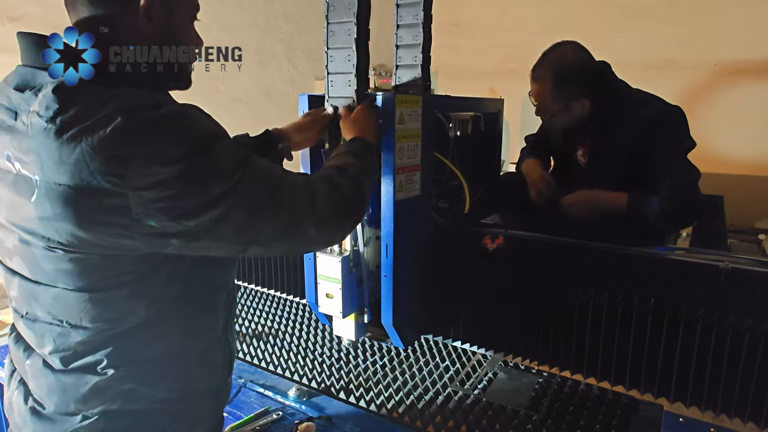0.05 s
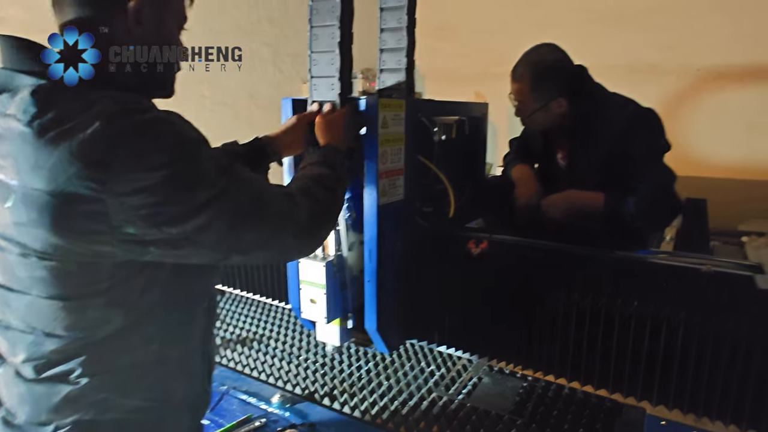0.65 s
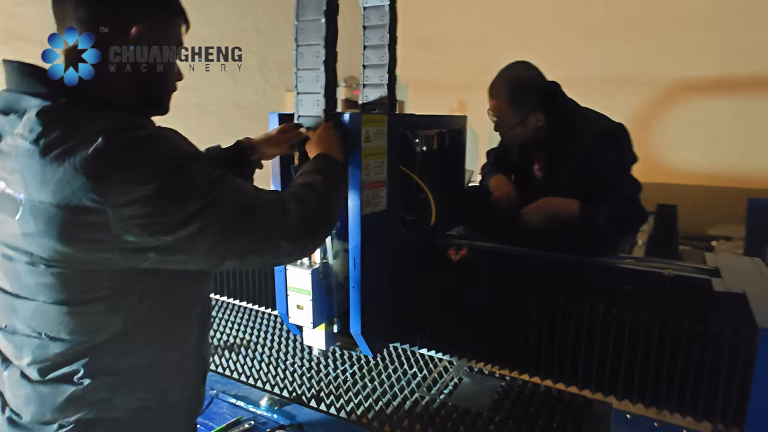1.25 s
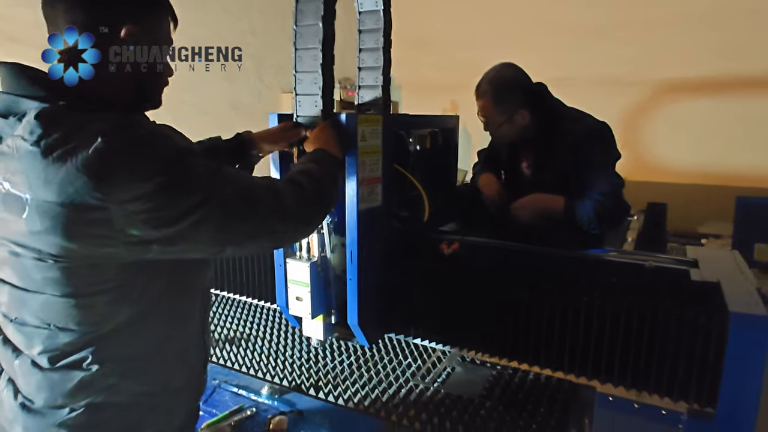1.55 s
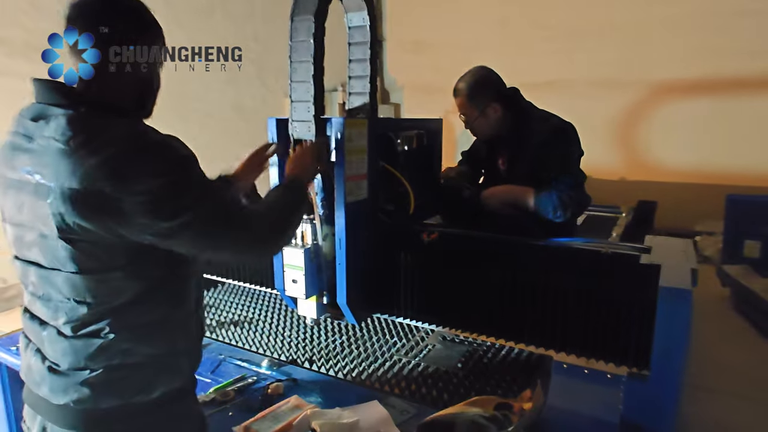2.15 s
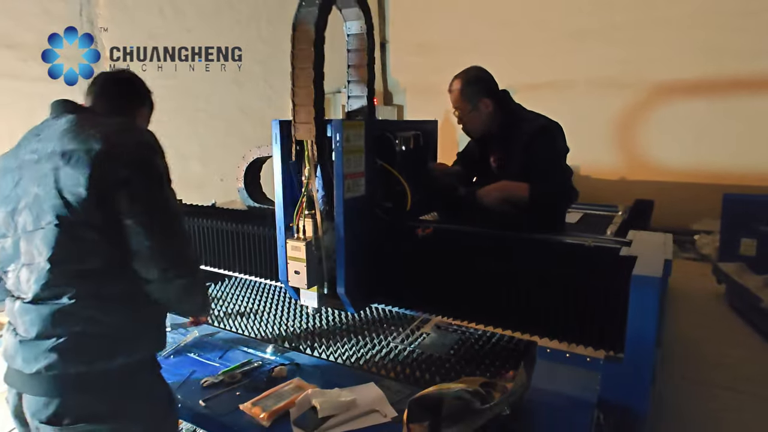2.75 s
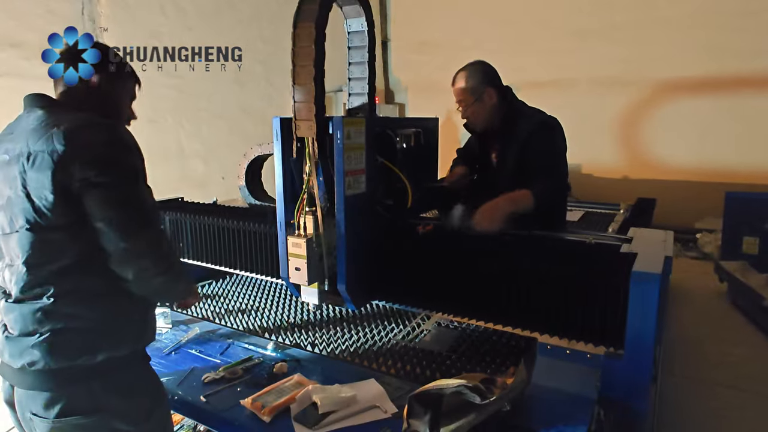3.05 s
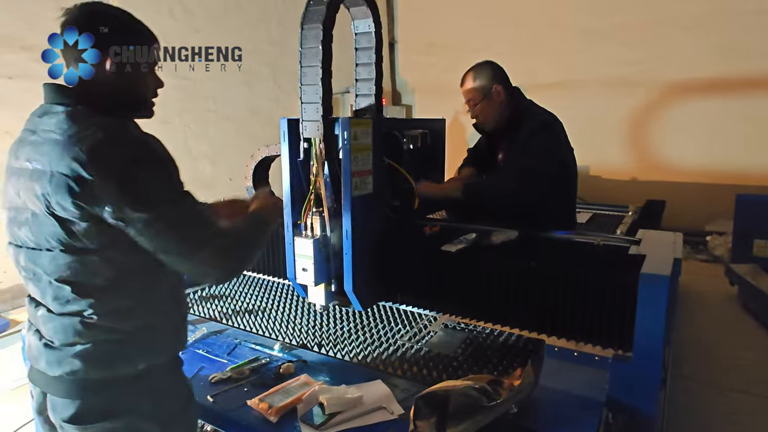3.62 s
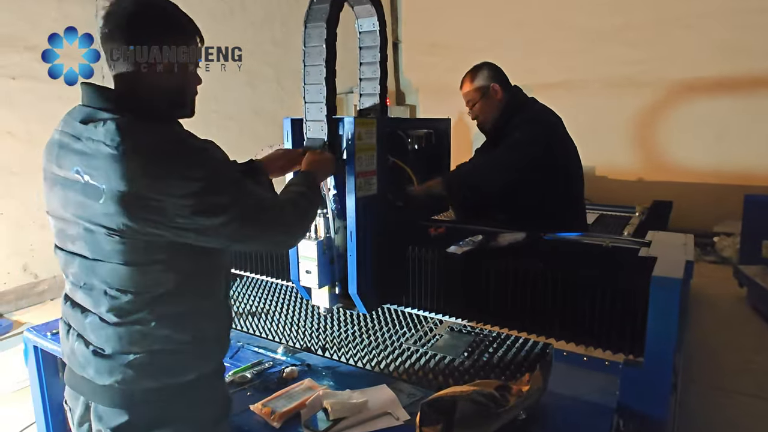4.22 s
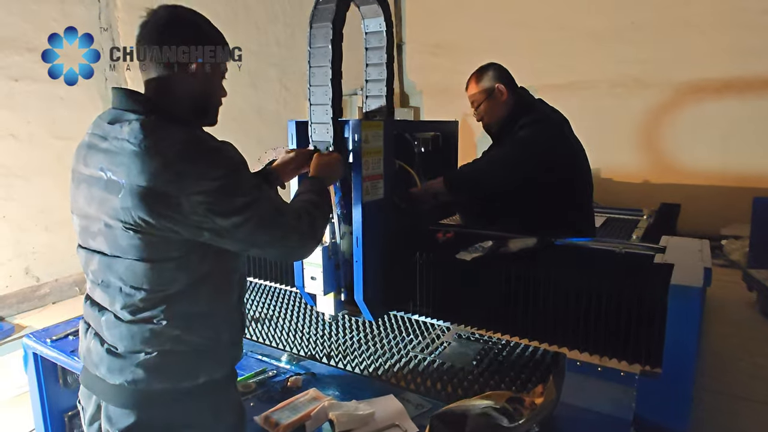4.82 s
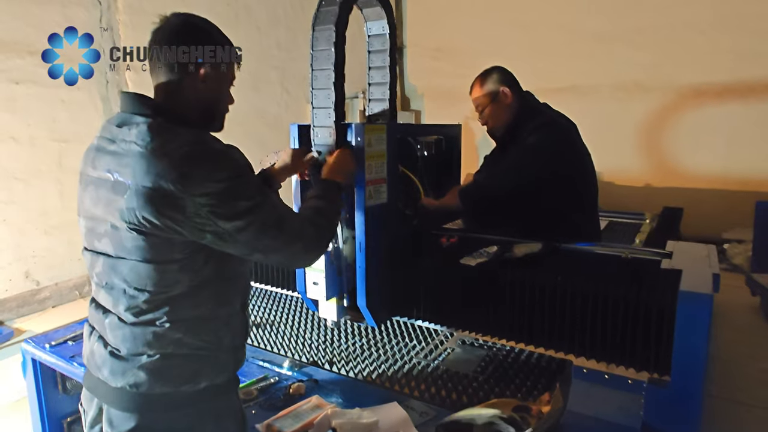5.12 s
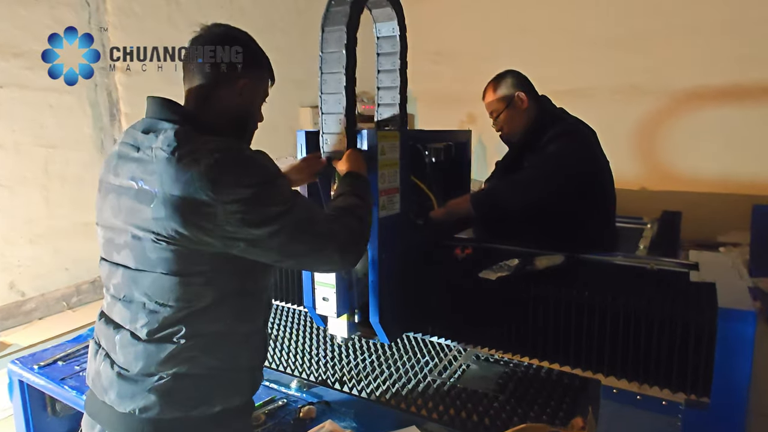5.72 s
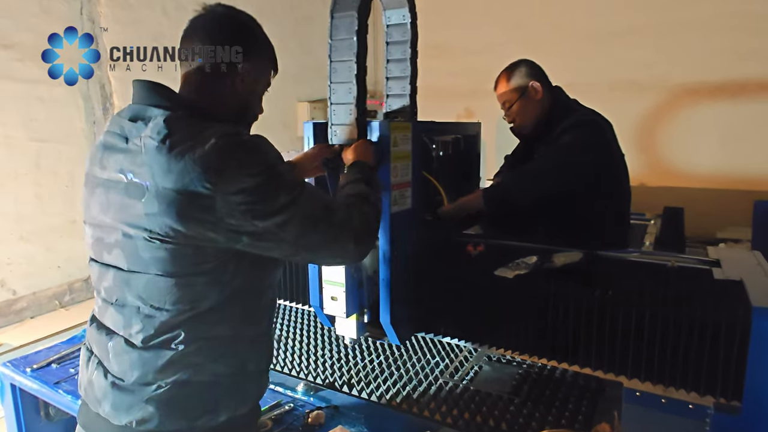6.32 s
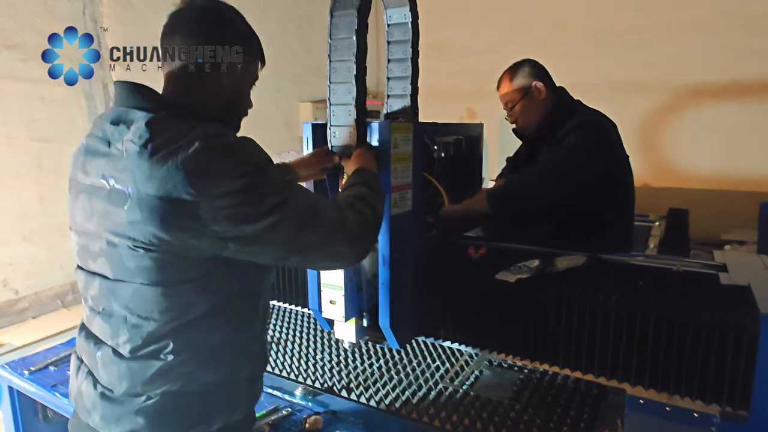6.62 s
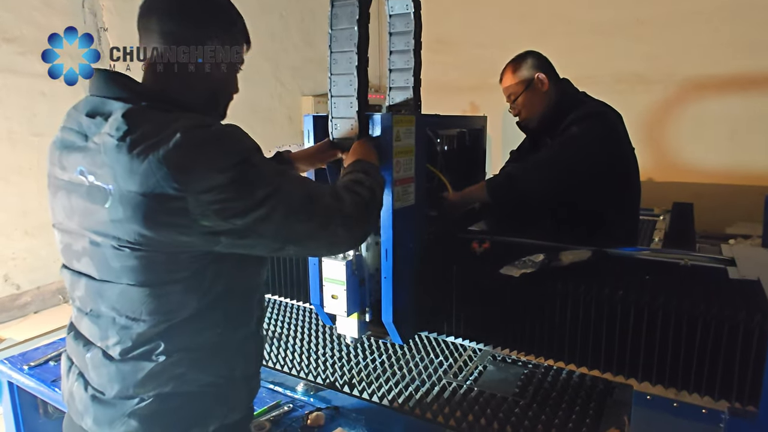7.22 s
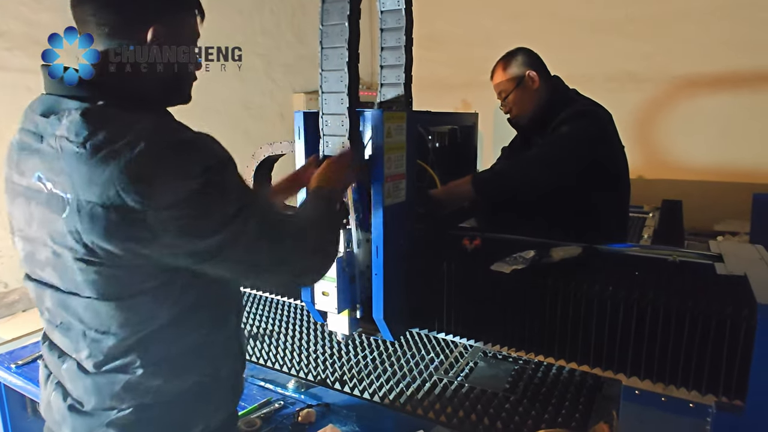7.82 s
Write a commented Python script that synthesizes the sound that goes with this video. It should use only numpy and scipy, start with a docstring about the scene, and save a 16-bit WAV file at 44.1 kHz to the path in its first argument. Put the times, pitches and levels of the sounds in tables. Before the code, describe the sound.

A laser cutter idles throughout in a bare workshop, with a faint mains hum, cooling fans and a thin wavering whine. A soft hiss swells into a sharp metallic valve snap at 0.7 seconds. Light finger ticks on fittings, a weaker hiss and nylon jacket rustle follow, until the valve shuts with a loud snap at 1.8 seconds. Each snap has a tiny rebound, a brief sheet-metal ring and a short room echo. From about 2.7 to 5 seconds there are only quiet sounds: a faint hiss, scattered ticks, scuffs of shoes and hands, and the jacket crinkling. After a lull, a softer valve snap comes at 6.4 seconds, followed by a slight hiss and scuff. A last loud, bright snap lands at 7.5 seconds, then faint rustle and one small tick over the hum at 8 seconds. The snaps are far louder than everything else.

```python
"""A laser cutter's gas valve snaps open and, a second later, shut, twice over, in a bare workshop.
Each slam of the plunger rings the valve body and the sheet-metal head and is answered by the hall.
Under it the machine idles with mains hum and cooling fans, and a soft hiss swells and fades.
Fingers tick on the fittings, shoes and hands scuff, and a padded nylon jacket rustles."""
import sys
import numpy as np
from scipy import signal
from scipy.fft import rfft, irfft, next_fast_len
from scipy.io import wavfile
from scipy.ndimage import uniform_filter1d, map_coordinates

SR = 44100
rng = np.random.default_rng(int(sys.argv[2]) if len(sys.argv) > 2 else 0)


def store_pcm(level_fs):
    """Save levels as 16-bit WAV."""
    pcm = np.round(np.clip(level_fs, -1, 1) * 32767).astype(np.int16)
    wavfile.write(sys.argv[1], SR, np.atleast_2d(pcm).T)


N = 355887


def amp(db):
    """Decibels to gain."""
    return 10 ** (np.asarray(db) / 20)


def unit_rms(x):
    """Scaled to rms 1."""
    return x / np.sqrt(np.mean(x ** 2) + 1e-20)


def along(points, hz):
    """Interpolate (Hz, value) points on a log frequency axis."""
    knots_hz, values = np.transpose(points)
    return np.interp(np.log(hz + 1), np.log(knots_hz + 1), values)


def clock():
    """Sample times in seconds."""
    return np.arange(N) / SR


def wobble(rate_hz):
    """Smooth random curve, rate_hz knots a second."""
    knots = rng.standard_normal(int(N * rate_hz / SR) + 4)
    return map_coordinates(knots, [clock() * rate_hz])


def filtered(x, response):
    """Apply a gain given as a function of Hz."""
    size = x.shape[-1]
    padded = next_fast_len(size + SR // 10)
    return irfft(rfft(x, padded) * response(np.fft.rfftfreq(padded, 1 / SR)), padded)[..., :size]


def shape(spectrum):
    """Gain curve of a (Hz, dB) spectrum."""
    return lambda hz: amp(along(spectrum, hz))


def resonance(centre_hz, q, stages=1):
    """Gain curve of equal resonators in series."""
    return lambda hz: 1 / np.hypot(1, q * (hz / centre_hz - centre_hz / (hz + 1))) ** stages


def strike(t, rise_s, t60_s):
    """Envelope: up 60 dB in rise_s to t = 0, then a decay."""
    return amp(-60 * np.maximum(-t / rise_s, t / t60_s))


def swell(peak_s, rise_db_per_s, hold_s, fall_db_per_s):
    """Envelope: climbs until peak_s, holds, sinks."""
    t = clock() - peak_s
    return amp(-np.maximum(0, np.maximum(-t * rise_db_per_s, (t - hold_s) * fall_db_per_s)))


def add(track, start_s, sound):
    """Mix a sound into the track."""
    part = track[:, max(round(start_s * SR), 0):]
    part[:, :sound.shape[-1]] += sound[:, :part.shape[-1]]


# Likeness of the two channels. Each row: frequency in Hz, left-right correlation.
STEREO_CORRELATION = [(100, 0.99), (300, 0.67), (700, 0.69), (1200, .7), (2000, .05), (3600, -0.54),
                      (5000, 0.85), (9000, -0.29)]

def noise(gain, size=N):
    """Coloured stereo noise of rms 1; channel correlation varies with frequency."""
    def mid_side_gain(hz):
        angle = np.arccos(np.clip(along(STEREO_CORRELATION, hz), -1, 1)) / 2
        return gain(hz) * np.array([np.cos(angle), np.sin(angle)])
    mid, side = filtered(rng.standard_normal((2, size)), mid_side_gain)
    return unit_rms(np.array([mid + side, mid - side]))


# Mains harmonics and fan tones. Each row: frequency in Hz, level in dB.
HUM_TONES = [(100, -64.5), (150, -71), (187.5, -70.5), (200, -72), (250, -76), (300, -69), (400, -82),
             (500, -80), (548, -83.5), (600, -80), (700, -78.5), (900, -85)]
# Course of the whine. Each row: time in seconds, level in dB.
WHINE_LEVELS = [(0, -79), (1.5, -73.5), (2.5, -75), (3.5, -72.5), (4.4, -75), (5.5, -74.5), (6.2, -77.5),
                (8, -78.5)]
# Fan rush, and the shared hiss and fizz. Each row: frequency in Hz, density in dB.
FAN_SPECTRUM = [(12, -58.5), (20, -21.5), (43, -11), (70, -7.5), (103, -9.5), (123, -4.5), (192, -1.5),
                (226, -8.5), (306, -12), (325, -16), (775, -15), (840, -15.5), (910, -16.5), (1050, -18.5),
                (2500, -35.5), (3250, -61.5), (5500, -120)]
HISS_SPECTRUM = [(600, -22.5), (1200, -5.5), (2200, 2), (3200, 2), (4700, 2), (5500, -1.5), (6400, -17),
                 (9000, -38)]
FIZZ_SPECTRUM = [(2500, -27.5), (5000, -9.5), (7000, 1), (9000, 2.5), (12000, 0.5), (15500, -3.5)]

def idling_machine(hum_db=-3, whine_hz=800, fans_db=-65, vent_db=-82, fizz_db=-86):
    """Mains and fan tones waver over the rush of cooling air; a whine swells and recedes."""
    t = clock()
    def tone(hz):
        waver = np.sqrt(2) * amp(0.6 * wobble(3))
        return waver * np.sin(2 * np.pi * (hz * t + rng.random()) + 0.15 * wobble(3))
    hum = amp(hum_db) * sum(amp(db) * tone(hz) for hz, db in HUM_TONES)
    whine = amp(np.interp(t, *np.transpose(WHINE_LEVELS))) * tone(whine_hz)
    fans = amp(fans_db) * noise(shape(FAN_SPECTRUM))
    vent = amp(vent_db) * noise(shape(HISS_SPECTRUM)) + amp(fizz_db) * noise(shape(FIZZ_SPECTRUM))
    return hum + whine + fans + vent


# Swells of hiss. Each row: peak in seconds, level in dB, rise in dB/s, hold in seconds, fall in dB/s.
HISS_SWELLS = [(0.02, -66, 30, 0.045, 22), (0.652, -50, 48, .04, 35), (1.164, -61.5, 43.5, 0.31, 116),
               (2.72, -66, 25, 0.026, 66.5), (3.918, -76.5, 14, .5, 24), (5.427, -76, 13.5, 0.25, 16),
               (6.498, -65.5, 199.5, 0.099, 87.5), (6.75, -74.5, 40.5, .25, 33.5)]

def soft_hiss(hiss_db=3, fizz_db=-6.5, rumble_db=-11, rumble_hz=78):
    """A soft hiss swells and fades, with a fine fizz above it and a low rumble."""
    power = sum((amp(db) * swell(peak_s, *course)) ** 2 for peak_s, db, *course in HISS_SWELLS)
    hiss = amp(hiss_db) * noise(shape(HISS_SPECTRUM))
    fizz = amp(fizz_db + 0.6 * wobble(36)) * noise(shape(FIZZ_SPECTRUM))
    flutter = amp(0.19 * wobble(17))
    rumble = amp(rumble_db) * noise(resonance(rumble_hz, q=2.2))
    return np.sqrt(power) * (flutter * (hiss + fizz) + rumble)


# Finger taps. Each row: time in seconds, level in dB, resonance in Hz, treble in dB.
FINGER_TICKS = [(0.092, -44.5, 4640, -21), (0.1616, -41.5, 2410, -29), (0.3295, -46.5, 2860, -11),
                (0.4785, -48.5, 3504, -29), (0.9192, -37.5, 2740, -33), (1.051, -41, 2300, -15),
                (1.1442, -45, 2680, -12), (1.176, -40, 4960, -8), (1.2115, -36.5, 3470, -20),
                (1.27, -45.5, 5100, -11), (1.3934, -47, 4940, -6), (1.4705, -42.5, 2820, -31),
                (1.6473, -43.5, 2550, -27), (1.6676, -38, 2970, -12.5), (1.698, -46.5, 2300, -31),
                (1.7354, -48.5, 2540, -21), (2.6888, -45.5, 4570, -18.5), (2.9786, -46.5, 1860, -17.5),
                (3.4095, -45.5, 1460, -12.5), (4.2485, -48.5, 1896, -14), (4.2878, -45.5, 2254, -36.5),
                (4.3126, -43, 2043, -20.5), (4.5269, -52.5, 1160, -14), (4.8699, -44.5, 1250, -16.5),
                (5.023, -56.5, 1420, -8), (5.115, -55, 1130, -14), (8.0047, -51, 2505, -22)]

def finger_ticks(body_db=-4, hiss_db=-9, fizz_db=1, lead_s=0.01, rise_s=0.002):
    """A finger taps a fitting: a short resonance with a bright edge."""
    out = np.zeros((2, N))
    t = np.arange(SR // 2) / SR - lead_s
    for at_s, db, hz, treble_db in FINGER_TICKS:
        body = amp(body_db) * strike(t, rise_s, t60_s=0.03) * noise(resonance(hz, q=15), len(t))
        hiss = amp(hiss_db) * noise(shape(HISS_SPECTRUM), len(t))
        fizz = amp(fizz_db + treble_db) * noise(shape(FIZZ_SPECTRUM), len(t))
        edge = strike(t, rise_s, t60_s=0.032) * (hiss + fizz)
        add(out, at_s - lead_s, amp(db) * (body + edge))
    return out


# Hall decay. Each row: frequency in Hz, T60 in seconds.
HALL_DECAY = [(200, 0.24), (800, 0.33), (1800, 0.36), (3200, 0.37), (5000, 0.42), (8000, .36),
              (15000, 0.18)]
# Wall reflection. Each row: frequency in Hz, gain in dB.
WALL_SPECTRUM = [(200, 1.5), (650, -2.5), (880, -3), (1300, -3), (1900, 0), (3000, -1), (4500, 0.5),
                 (7000, -3.5), (15000, -8)]

def hall(x, late_db=-18, late_t60_s=1.1, build_s=0.01):
    """Reflections: a dense tail that builds up, and a weak long one from the far end."""
    hz, t, bins = signal.stft(noise(np.ones_like, SR), SR, nperseg=256)
    dense = amp(-60 * t / along(HALL_DECAY, hz)[:, None])
    late = amp(late_db - 60 * t / late_t60_s) * shape(WALL_SPECTRUM)(hz)[:, None]
    arrivals = 1 - np.exp(-(np.arange(SR) / SR / build_s) ** 2)
    tail = signal.istft(bins * (dense + late), SR, nperseg=256)[1][:, :SR] * arrivals
    tail = filtered(unit_rms(tail) / np.sqrt(SR), shape(WALL_SPECTRUM))
    return signal.fftconvolve(x, tail, axes=1)[:, :x.shape[-1]]


# Shoe and hand scuffs. Each row: middle in seconds, level in dB, half length in seconds,
# centre in Hz, weight in dB.
SCUFF_STROKES = [(0.52, -62.5, 0.25, 901, -3.5), (1.101, -65, 0.29, 700, -0.5), (1.49, -72, 0.02, 1090, 14),
                 (2.771, -65.5, 0.015, 1580, -2.5), (2.91, -62.5, 0.015, 850, -3),
                 (3.0, -59, 0.026, 1172, 0.5), (3.227, -62.5, 0.02, 2400, -13), (3.31, -65, 0.013, 2300, 0),
                 (3.369, -66.5, 0.03, 1405, -4.5), (3.421, -57, 0.017, 1150, -1.5),
                 (3.482, -63, 0.0096, 1278, -7), (4.289, -57, 0.035, 1867, -9),
                 (4.845, -66.5, 0.038, 2300, -3), (5.934, -68.5, 0.074, 750, -8),
                 (6.545, -58.5, 0.057, 1594, -2)]
# Dull body of a scuff. Each row: frequency in Hz, density in dB.
SOLE_SPECTRUM = [(30, -23.5), (90, -4), (280, -1.5), (420, -8.5), (800, -6), (1500, -22), (3000, -40.5)]

def scuffs(grit_db=4):
    """Shoes and hands rub: gritty friction with dull weight behind it."""
    out = np.zeros((2, N))
    t = np.arange(SR // 2) / SR
    for middle_s, db, half_s, hz, weight_db in SCUFF_STROKES:
        roughness = unit_rms(uniform_filter1d(rng.standard_normal(len(t)), size=130))
        grit = unit_rms(amp(grit_db * roughness))
        rub = grit * noise(resonance(hz, q=2.2, stages=2), len(t))
        weight = amp(weight_db) * noise(shape(SOLE_SPECTRUM), len(t))
        stroke = np.exp(-((t - t.mean()) / half_s) ** 4)
        add(out, middle_s - t.mean(), amp(db) * stroke * (rub + weight))
    return out


def ringing(modes, t, tint_db=np.zeros_like):
    """Struck metal: decaying modes, neighbours in opposite sign, high ones out of step left to right."""
    hz, db, t60_s = np.transpose(modes)[:, :, None]
    age_s = np.maximum(t, 0)
    signs = (-1) ** np.arange(len(hz))[:, None]
    gains = signs * amp(db + tint_db(hz) + rng.normal(0, 0.97, hz.shape))
    skew_rad = np.multiply.outer([1, -1], hz / 5500)
    waves = gains * amp(-60 * age_s / t60_s) * np.sin(2 * np.pi * hz * age_s + skew_rad)
    return waves.sum(axis=1) * (1 - np.exp(-age_s / 0.0003))


# Cutting head modes. Each row: frequency in Hz, level in dB, T60 in seconds.
HEAD_MODES = [(656, -3.5, .085), (774.4, -5.5, 0.068), (834, -3.5, 0.033), (1066.3, -1.5, .06),
              (1232, -3.5, 0.05), (1367, -3, 0.039), (1580, -14.5, 0.031)]
# Knock on the head. Each row: frequency in Hz, density in dB.
KNOCK_SPECTRUM = [(400, -38), (570, -5.5), (680, -3), (1350, 1), (1700, -10.5), (3000, -41)]

def cutting_head(t, blow, focus_hz, db_per_octave, knock_db=-10, highpass_hz=520):
    """A blow favours the modes near focus_hz; the small head radiates little bass."""
    tint_db = lambda hz: -db_per_octave * np.abs(np.log2((hz + 1) / focus_hz))
    knock = amp(knock_db) * blow * noise(lambda hz: amp(along(KNOCK_SPECTRUM, hz) + tint_db(hz)), len(t))
    highpass = signal.butter(7, highpass_hz, "high", fs=SR, output="sos")
    return signal.sosfilt(highpass, ringing(HEAD_MODES, t, tint_db) + knock)


# Valve body modes. Each row: frequency in Hz, level in dB, T60 in seconds.
VALVE_MODES = [(1960, -12, 0.036), (1975, -17, 0.078), (2250, -13, .05), (2950, -19.5, 0.014),
               (4240, -18, 0.017), (4780, -14.5, 0.026), (5100, -16.5, .03), (5428, -20.5, 0.028)]
# Noisy parts of a snap. Each row: frequency in Hz, density in dB.
CRACK_SPECTRUM = [(400, -36), (580, -12.5), (900, 1), (1400, 1.5), (1800, -2), (2300, 0), (3200, -4.5),
                  (4100, -2), (4900, 1.5), (5600, -4.5), (6500, -15), (9000, -38)]
SIZZLE_SPECTRUM = [(4500, -42), (6500, -4.5), (7200, -6), (8800, 2), (11000, -5.5), (13000, -7),
                   (15500, -8.5)]
THUD_SPECTRUM = [(40, -27), (110, -7), (160, -4.5), (215, 2.5), (320, -8.5), (500, -11.5), (900, -40)]
# Plunger slams. Each row: time in seconds, head ring in dB, focus in Hz, fall-off in dB/octave, # crack,
# sizzle, thud, room and lead-in in dB, echo delay in seconds, echo in dB, # cover ring in Hz, cover ring in dB,
# left over right in dB, seat ping in dB.
VALVE_SNAPS = [(0.6871, -10, 1080, 6.5, -17.5, -23, -44.5, -13.5, -9, 0.032, -22.5, 1260, -35.5, 1, -26.5),
               (1.8060, -6, 856, 30, -11, -19.5, -38, -8.5, -27.5, 0.029, -24.5, 880, -32, 2.5, -22),
               (6.3767, -21.5, 670, 6, -25, -35, -49.5, -10, -24, 0.028, -42, 1200, -53, 3, -27),
               (7.4539, -13.5, 1220, 16.5, -10, -18.5, -45, -9, -23, 0.028, -15, 1690, -33.5, 3, -14.5)]

def valve(margin_s=0.04, lead_in_s=0.04, rise_s=0.007, ping_hz=4950, head_room_db=-4):
    """The plunger slams: the seat pings, valve, head and covers ring, and a faint echo of the snap follows."""
    out = np.zeros((2, N))
    t = np.arange(SR) / SR - margin_s
    for (at_s, ring_db, focus_hz, db_per_octave, crack_db, sizzle_db, thud_db, room_db, lead_in_db,
         echo_s, echo_db, cover_hz, cover_db, pan_db, ping_db) in VALVE_SNAPS:
        # a brief rush of noise rises into each snap
        lead_in = amp(lead_in_db) * strike(t, lead_in_s, t60_s=rise_s)
        blow = lambda t60_s: lead_in + strike(t, rise_s, t60_s)
        head = amp(ring_db) * cutting_head(t, blow(t60_s=0.05), focus_hz, db_per_octave)
        crack = amp(crack_db) * blow(t60_s=0.055) * noise(shape(CRACK_SPECTRUM), SR)
        body = amp(crack_db) * ringing(VALVE_MODES, t)
        sizzle = amp(sizzle_db) * blow(t60_s=0.054) * noise(shape(SIZZLE_SPECTRUM), SR)
        ping = amp(ping_db) * noise(resonance(ping_hz, q=4.5, stages=2), SR)
        ping *= strike(t, rise_s, t60_s=0.024)
        gantry_thud = amp(thud_db) * noise(shape(THUD_SPECTRUM), SR)
        gantry_thud *= strike(t - 0.014, rise_s=0.017, t60_s=0.4)
        covers = amp(cover_db) * noise(resonance(cover_hz, q=3.2, stages=2), SR)
        covers *= strike(t - 0.02, rise_s=0.03, t60_s=0.42)
        snap = (head + body + crack + sizzle + ping) * amp([[pan_db / 2], [-pan_db / 2]])
        room = amp(room_db) * hall(crack + sizzle + amp(head_room_db) * head)
        add(out, at_s - margin_s, snap + gantry_thud + covers + room)
        add(out, at_s - margin_s + echo_s, amp(echo_db) * snap)
    return out


# Jacket strokes. Each row: peak in seconds, level in dB, 60 dB attack in seconds,
# 60 dB release in seconds, relative swish in dB.
JACKET_STROKES = [(0.865, -57.5, 0.19, 0.12, 2), (1.675, -61.5, 0.25, .3, 2), (1.77, -63.5, .08, 0.31, -9),
                  (2.98, -64, .06, 0.34, 4), (3.16, -73, .45, 1.14, 3.5), (3.41, -61.5, .08, 0.39, -3.5),
                  (3.985, -60.5, 0.035, 0.23, -13.5), (4.255, -65.5, 0.18, .5, 1.5),
                  (4.565, -73.5, .3, 0.34, 4), (4.8, -64.5, 0.067, 0.53, -1), (5.1, -80, 0.47, 0.3, 3),
                  (5.63, -77, 0.28, .7, -3.5), (5.93, -82.5, 0.34, 0.92, 2.5), (6.625, -72, .2, .35, -9.5),
                  (7.9, -77, 0.48, 1.05, 5.5)]

def jacket(fizz_db=0.5, swish_db=3, crinkle_db=2.5, hold_s=0.012):
    """Nylon crinkles as it slides: a high fizz over a lower swish."""
    fizz_gain, swish_gain = np.zeros((2, N))
    for peak_s, db, attack_s, release_s, stroke_swish_db in JACKET_STROKES:
        stroke = amp(db) * swell(peak_s, 60 / attack_s, hold_s, 60 / release_s)
        fizz_gain += stroke
        swish_gain += amp(stroke_swish_db) * stroke
    crinkle = unit_rms(amp(crinkle_db * (wobble(300) + 0.38 * wobble(60))))
    fizz = amp(fizz_db) * fizz_gain * noise(shape(FIZZ_SPECTRUM))
    swish = amp(swish_db) * swish_gain * noise(shape(HISS_SPECTRUM))
    return crinkle * (fizz + swish)


def scene(handling_room_db=-10):
    """The machine and the work around it."""
    snaps = valve()
    handling = finger_ticks() + scuffs()
    handling += amp(handling_room_db) * hall(handling)
    return snaps + handling + soft_hiss() + jacket() + idling_machine()


# Microphone port balance. Each row: frequency in Hz, left over right in dB.
PORT_BALANCE = [(300, -0.5), (700, 2), (1300, -1), (2200, -5), (3600, -7.5), (5000, -12.5), (6000, -7),
                (7500, -1.5), (12000, 3.5)]

def record(dry, top_hz=16050, taper_hz=400):
    """Two microphone ports colour the sound differently; peaks are soft-limited, the top is cut."""
    def ports(hz):
        gains = amp(np.outer([0.5, -0.5], along(PORT_BALANCE, hz)))
        return gains / np.sqrt(np.mean(gains ** 2, axis=0))
    heard = filtered(dry, ports)
    limited = heard / (1 + heard ** 6) ** (1 / 6)
    return filtered(limited, lambda hz: np.clip((top_hz - hz) / taper_hz, 0, 1))


dry = scene()
out = record(dry)
store_pcm(out)
```